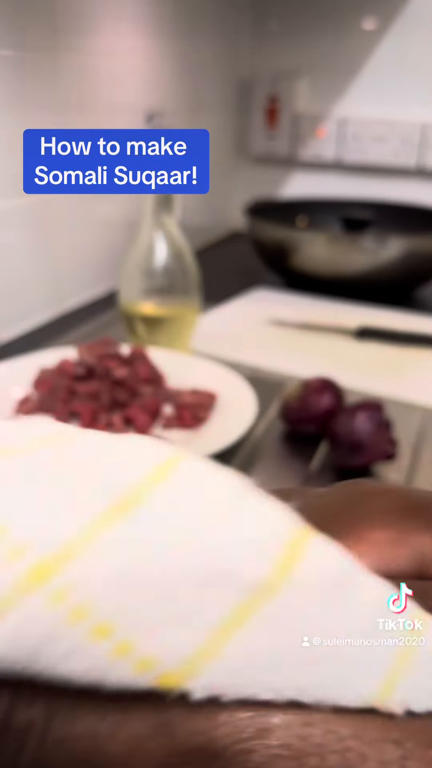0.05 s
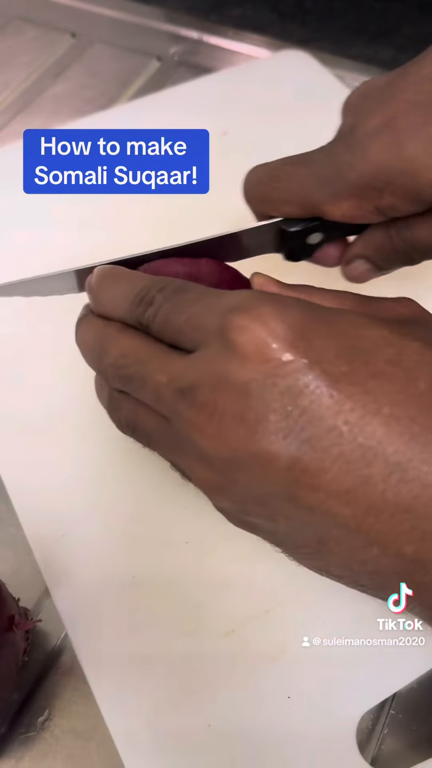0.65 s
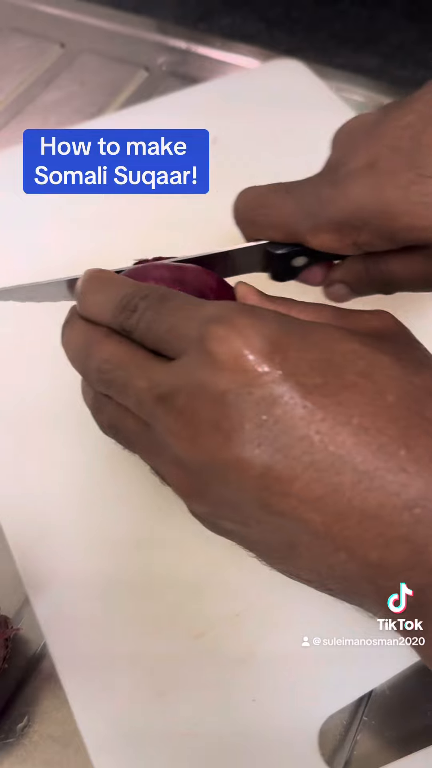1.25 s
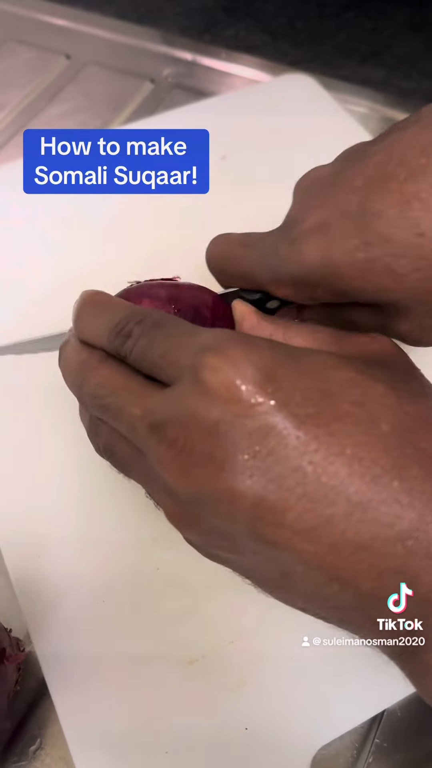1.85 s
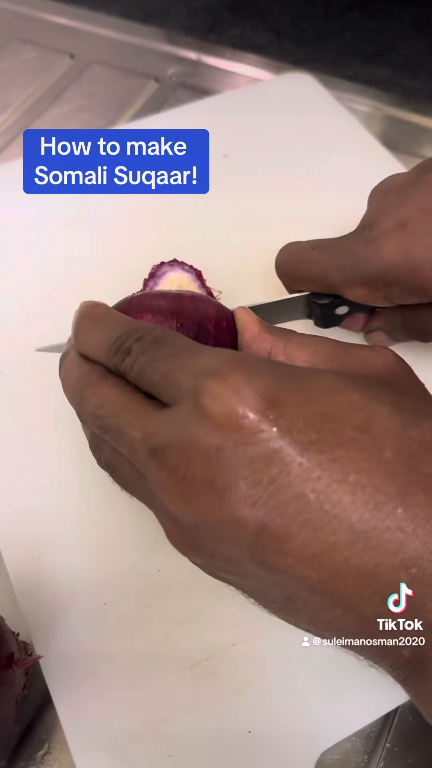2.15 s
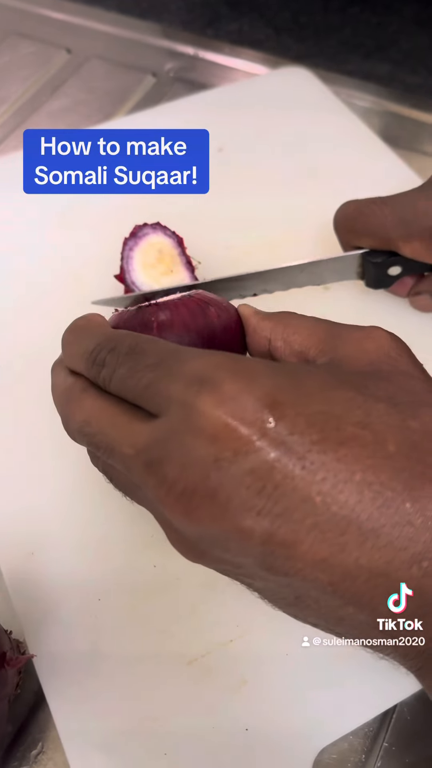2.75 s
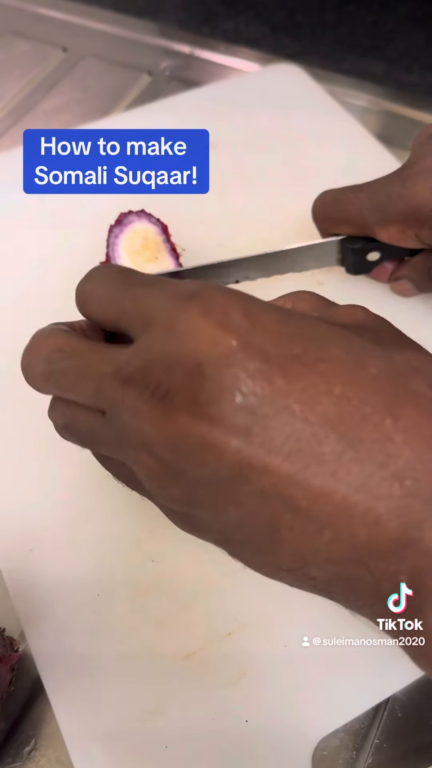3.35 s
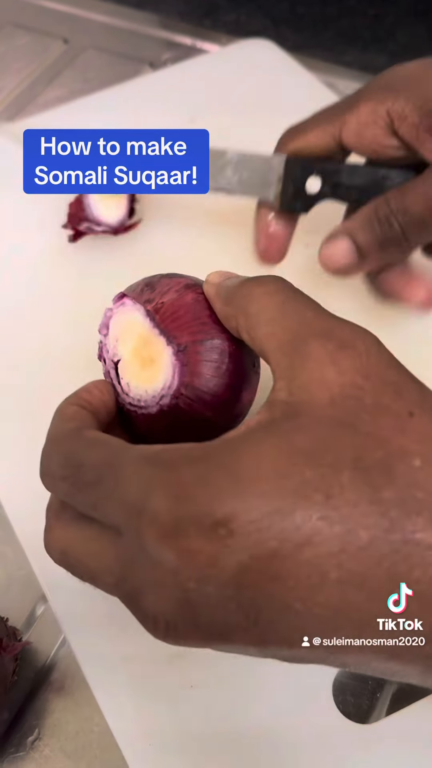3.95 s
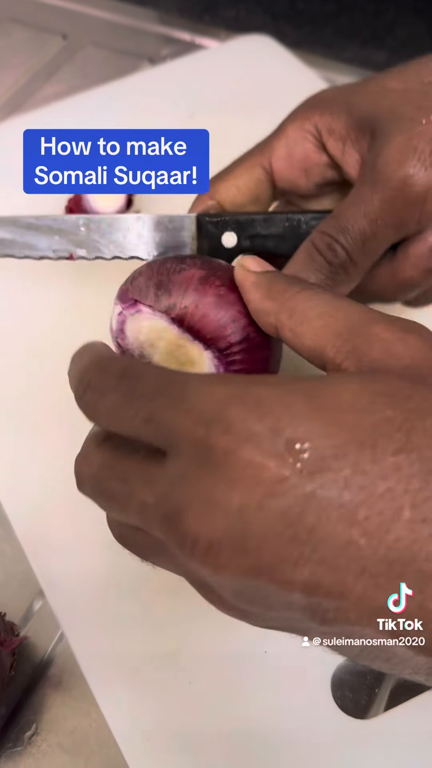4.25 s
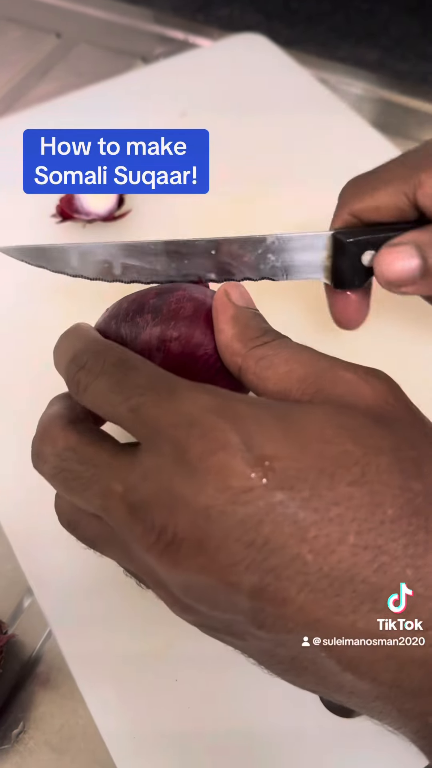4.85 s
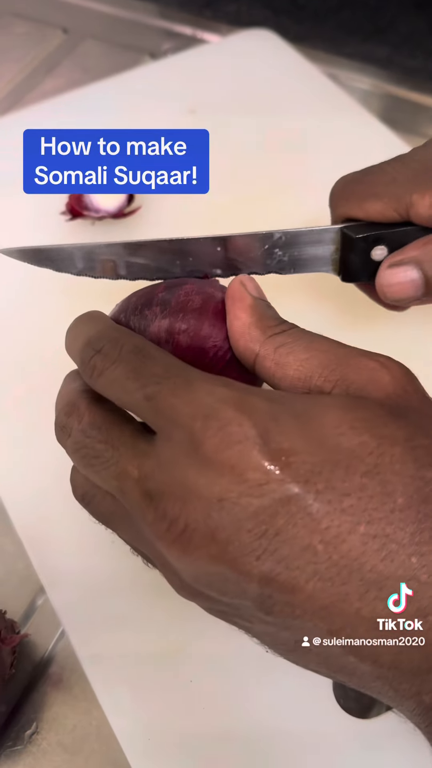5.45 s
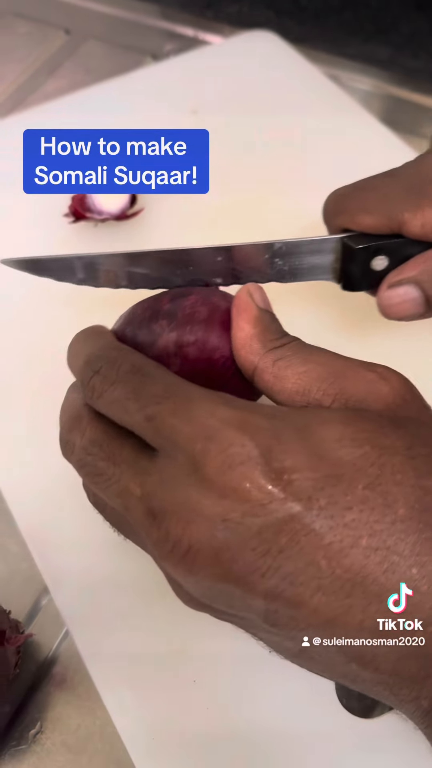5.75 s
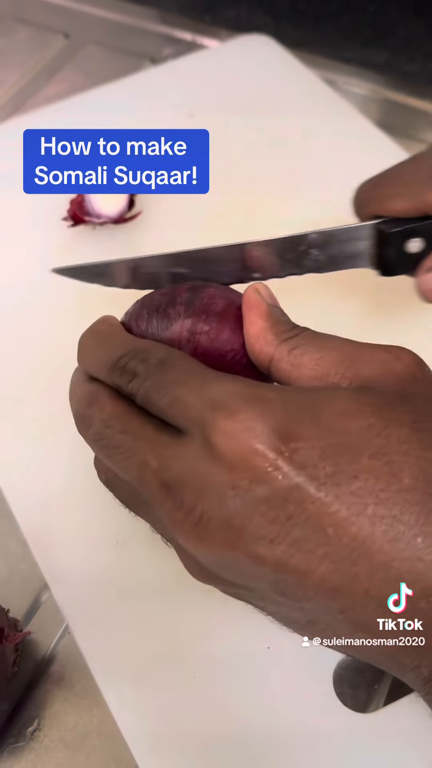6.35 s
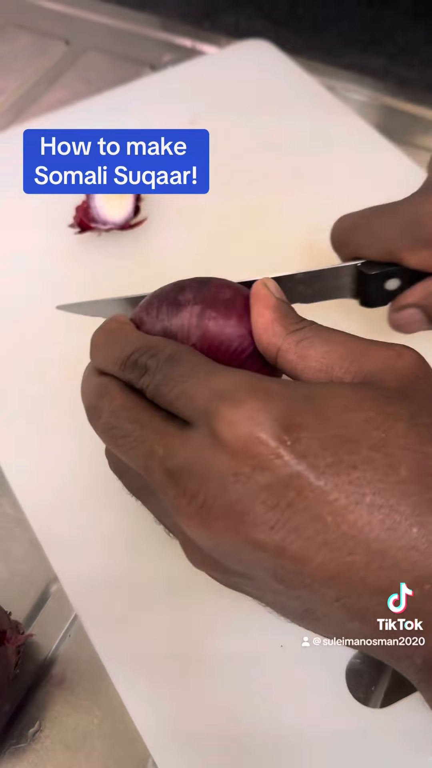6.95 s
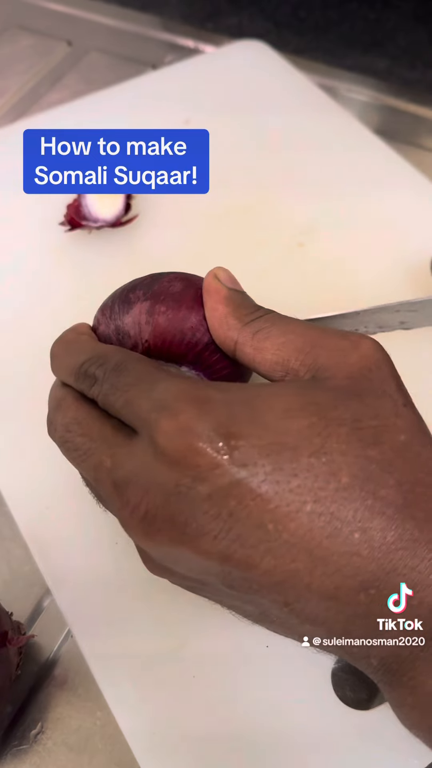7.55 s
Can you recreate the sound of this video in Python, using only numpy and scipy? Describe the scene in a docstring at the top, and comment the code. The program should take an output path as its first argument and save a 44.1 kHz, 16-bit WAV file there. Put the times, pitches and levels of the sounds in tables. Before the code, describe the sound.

After a brief towel rustle, a serrated knife saws into an onion in short strokes, crackling the dry skin and shaking a plastic chopping board. The blade knocks down, draws through with a wet fizz and lands with a sharp clack. The onion is turned and set down with a soft thump, then after a lull the sawing resumes. It is heard close in a small, hard kitchen with a low hum.

```python
"""A serrated knife saws both ends off an onion on a plastic chopping board.
Each stroke crackles through the dry skin and shakes the board; the blade knocks down as it breaks
through. A towel rustles briefly first, and between the two cuts the onion is turned and set down.
It is all heard from close by, in a small, hard kitchen with a low hum."""
import sys
import numpy as np
from scipy import signal
from scipy.fft import rfft, irfft, next_fast_len
from scipy.io import wavfile
from scipy.ndimage import uniform_filter1d

SR = 44100
rng = np.random.default_rng(int(sys.argv[2]) if len(sys.argv) > 2 else 0)


def transcribe(signal):
    """Save signal, clipped to [-1, 1], as a 16-bit WAV file at the path in sys.argv[1]."""
    frames = np.atleast_2d(signal).T
    limited = np.clip(frames, -1, 1)
    pcm = np.round(limited * 32767).astype(np.int16)
    wavfile.write(sys.argv[1], SR, pcm)


N = 334983
T = np.arange(N) / SR
SCRAPE_START_S = 2.76  # the blade starts to scrape out of the cut
TEAR_START_S, TEAR_LENGTH_S = 3.318, 0.209  # the last strip of skin tears
TREBLE_LIMIT_HZ = 16200


def sawing():
    """The knife's teeth burst the onion's skin and cells, and the same drag shakes the board."""
    crackle, grind, push = saw_motion()
    fizz, load = slow_draw()
    crackle += amp(-8.5) * fizz * (T < SCRAPE_START_S)  # skin still lies under the teeth
    onion = bursting_onion(crackle, fizz)
    return onion + shaking_board(amp(-5.5) * grind + amp(-2.5) * load, push + amp(11) * load)


# saw strokes: (start [s], length [s], skin crackle [dB], load on the teeth [dB], push on the board [dB])
SAW_STROKES = [(0.183, 0.09, -56.5, -58.5, -46), (0.323, 0.08, -57.5, -65, -48),
               (0.455, 0.072, -54, -52, -44), (0.6, 0.091, -57.5, -59, -45.5),
               (0.751, 0.078, -57.5, -53.5, -43.5), (0.871, 0.13, -61.5, -57, -46.5),
               (1.042, 0.12, -57, -55, -42.5), (1.167, 0.14, -66, -58.5, -49.5),
               (1.348, 0.1, -54, -46.5, -39), (1.476, 0.12, -60, -57.5, -49.5),
               (1.662, 0.063, -59, -49.5, -40.5), (1.719, 0.082, -35.5, -54, -35),
               (1.842, 0.11, -39.5, -63, -39.5), (1.958, 0.24, -78, -57, -42.5),
               (2.18, 0.094, -46.5, -45.5, -49), (6.126, 0.086, -60.5, -63.5, -49.5),
               (6.256, 0.074, -53.5, -58.5, -43.5), (6.39, 0.092, -43.5, -52.5, -43),
               (6.533, 0.076, -46, -52.5, -41), (6.666, 0.087, -41.5, -47, -38.5),
               (6.807, 0.084, -49, -52, -42), (6.931, 0.11, -41.5, -54.5, -35.5),
               (7.078, 0.098, -33.5, -46.5, -36), (7.2, 0.12, -52, -58, -41),
               (7.364, 0.089, -46, -52.5, -46.5), (7.501, 0.13, -60.5, -56, -47)]
# the blade rests on the skin, feeling for its place: (start [s], length [s], level [dB])
BLADE_GRAZES = [(5.095, 0.072, -85), (5.296, 0.196, -90), (5.561, 0.39, -79), (5.991, 0.1, -78)]
# fingers rustle over the loose skin: (start [s], length [s], level [dB])
FINGER_RUSTLES = [(3.558, .13, -66), (3.693, 0.16, -75.5), (3.885, .08, -73), (4.013, 0.061, -73.5),
                  (4.116, 0.058, -77), (4.26, 0.063, -76.5), (4.39, .045, -77.5)]
def saw_motion(lead_s=0.03, grind_lag_s=0.0097, push_lag_s=0.012, push_release_s=0.099):
    """How strongly the skin crackles, the teeth grind and the board is pushed at each moment."""
    crackle, grind, push = np.zeros((3, N))
    for start, length, crackle_db, load_db, push_db in SAW_STROKES:
        speed = stroke(length)
        add(crackle, start - lead_s, amp(crackle_db - 15.5) * stroke(2 * lead_s))  # a light drag first
        add(crackle, start, amp(crackle_db) * speed)
        add(grind, start + grind_lag_s, amp(load_db) * speed)
        # the board takes the load later and lets go of it slowly
        pressure = stroke(length + push_release_s / 2, push_release_s)
        add(push, start + push_lag_s, amp(push_db) * pressure)
    for start, length, db in BLADE_GRAZES + FINGER_RUSTLES:
        add(crackle, start, amp(db) * stroke(length))
    add(push, TEAR_START_S, amp(-58.5) * stroke(TEAR_LENGTH_S))
    return crackle, grind, push


def stroke(length, release_s=0.024, attack_s=0.035):
    """One pass of the blade speeds up, runs and stops."""
    t = T[:round(length * SR)]
    rise = np.sin(np.pi / 2 * np.clip(t / attack_s, 0, 1))
    fall = np.sin(np.pi / 2 * np.clip((length - t) / release_s, 0, 1))
    return rise * fall


# the slow pull through the wet flesh: (time [s], juicy fizz [dB], load on the teeth [dB])
DRAW_LEVELS = [(2.29, -55, -76), (2.312, -67, -75), (2.334, -51.5, -64.5), (2.385, -48, -54.5),
               (2.41, -88, -61.5), (2.425, -53.5, -61.5), (2.535, -44, -71), (2.58, -46, -60),
               (2.67, -55, -64), (2.688, -45, -58.5), (2.72, -58.5, -66), (2.85, -61, -75),
               (2.865, -76, -76), (2.885, -59, -70.5), (2.92, -55.5, -74), (2.97, -72, -76.5),
               (3.04, -53.5, -79.5), (3.09, -71.5, -79), (3.145, -57.5, -76.5), (3.24, -103, -99)]
def slow_draw(fizz_db_per_s=190.5, load_db_per_s=89.5):
    """Strength of fizz and load in one slow pull, ending in a tear that grows until the skin gives."""
    fizz, load = gains(DRAW_LEVELS)
    pull = stroke(TEAR_LENGTH_S, release_s=0.0035)
    time_left = TEAR_LENGTH_S - T[:len(pull)]
    add(fizz, TEAR_START_S, pull * amp(-42 - fizz_db_per_s * time_left))
    add(load, TEAR_START_S, pull * amp(-58.5 - load_db_per_s * time_left))
    return fizz, load


# tone colour of the dry skin: (frequency [Hz], relative level [dB])
SKIN_COLOUR = [(300, -23), (900, 3.5), (2000, -2.5), (3000, 3), (4300, 2), (6000, 4), (7500, 2.5),
               (9600, 7.5), (12000, 5.5), (15000, 8), (16200, 6)]
# tone colour of the juicy flesh: (frequency [Hz], relative level [dB])
JUICE_COLOUR = [(2000, -30), (5500, -13), (7100, -15), (8500, -11), (10500, -6.5), (12500, -7.5),
                (14500, -0.5), (15600, 3), (16300, -19)]
def bursting_onion(crackle, fizz):
    """Dry skin crackles and wet cells fizz as thousands of them break under the teeth."""
    flakes = grains(per_s=7000, spread_db=3.5, clump_db=2.7, clump_hz=90)
    cells = grains(per_s=2000, spread_db=4, clump_db=2.4, clump_hz=60)
    skin = amp(-0.2) * coloured(shifting(flakes, shift_db=0.5, rate_hz=10), SKIN_COLOUR)
    juice = amp(-0.6) * coloured(shifting(cells, shift_db=3, rate_hz=34.85), JUICE_COLOUR)
    skin += amp(-9.5) * coloured(chips(), SKIN_COLOUR)
    juice += amp(-9.5) * coloured(chips(), JUICE_COLOUR)
    return (skin + rasp()) * crackle + juice * fizz


def shifting(x, shift_db, rate_hz, edges_hz=(1200, 2200, 3600, 6000, 11000)):
    """Coarse, middling and fine breaks take turns, so the tone colour keeps changing."""
    size = next_fast_len(len(x))
    spectrum = rfft(x, size)
    band = np.searchsorted(edges_hz, np.fft.rfftfreq(size, 1 / SR))
    return sum(irfft(spectrum * (band == k), size)[:N] * amp(shift_db * wobble(rate_hz))
               for k in range(len(edges_hz) + 1))


def chips(per_s=45, decay_s=0.0039):
    """Small flakes break off at random, each with a short crack."""
    t = T[:SR // 50]
    crack = rng.standard_normal(len(t)) * np.exp(-t / decay_s)
    breaks = grains(per_s=per_s, spread_db=2.5, clump_db=1, clump_hz=20)
    return evened(signal.oaconvolve(breaks, crack)[:N])


# the notes at which the stiff skin rings: (pitch [Hz], relative level [dB])
RASP_NOTES = [(2400, -17), (4500, -12.5)]
def rasp(width_hz=260, waver=0.077, waver_hz=9):
    """Teeth catch and ring the stiff skin, whose pitch drifts as the blade travels."""
    out = np.zeros(N)
    for hz, db in RASP_NOTES:
        catches = grains(per_s=900, spread_db=2.5, clump_db=2.5, clump_hz=60)
        pitch = hz * (1 + waver * wobble(waver_hz))
        carrier = np.exp(2j * np.pi * np.cumsum(pitch) / SR)
        # keep only a narrow band around the moving pitch
        ringing = carrier * filtered(catches / carrier + 1e-12, width_hz, "low")
        out += amp(db) * evened(ringing.real)
    return out


# tone colour of the push on the board: (frequency [Hz], relative level [dB])
PUSH_COLOUR = [(20, -24.5), (42, 14), (70, 0.5), (115, 3.5), (210, 0.5), (330, -7.5), (500, -17.5),
               (1000, -28.5)]
def shaking_board(grind, push):
    """Slipping teeth rattle the board, while the drag of the blade makes it rumble."""
    slips = grains(per_s=1300, spread_db=3.3, clump_db=2.2, clump_hz=60)
    ring = board_ring()
    rattle = evened(signal.oaconvolve(slips, ring)[:N])
    grit = evened(filtered(slips, [300, 2200], "band"))
    teeth = evened(filtered(rattle + 2.2 * grit, 240, "high", order=3))
    rumble = coloured(signal.oaconvolve(rng.standard_normal(N), ring)[:N], PUSH_COLOUR)
    return teeth * grind + rumble * push


# the board's own notes, with no hand on it: (pitch [Hz], relative level [dB], time to fade 60 dB [s])
BOARD_NOTES = [(41.5, -9.5, 0.8), (63, -1, 0.075), (115, 1.5, 0.26), (210.2, -0.5, .22), (255, -3, 0.12),
               (288.5, -7, 0.36), (324, -0.5, 0.13), (404, 0, 0.12), (466, -7.5, 0.66), (537.5, -4, 0.45),
               (708, 1.5, 0.07), (824, -8.5, 0.28), (954, 5, 0.036), (1085, 0, 0.11), (1253, -6.5, 0.25),
               (1720, -5.5, 0.039), (2230, -9, 0.08)]
def board_ring(hand_damping_s=0.069):
    """The board rings after one sharp tap, cut short by the hand that rests on it."""
    t = T[:SR // 2]
    notes = sum((-1) ** k * amp(db - 60 * t / fade_s) * np.sin(2 * np.pi * hz * t)
                for k, (hz, db, fade_s) in enumerate(BOARD_NOTES))
    return notes * np.exp(-t / hand_damping_s)


# skin snaps under blade and fingers: (time [s], relative level [dB], pitch [Hz], decay time [s])
SKIN_SNAPS = [(.3546, -41, 13000, 0.0024), (.4564, -57, 14000, .002), (0.4663, -52, 4930, .003),
              (.467, -39, 12000, .002), (.7765, -35.5, 12000, .002), (.7865, -28.5, 12200, 0.0055),
              (.788, -37.5, 4250, 0.0035), (.801, -43, 13100, 0.0027), (.9716, -34.5, 11900, .003),
              (1.0725, -41, 11100, 0.0025), (1.2113, -37.5, 8470, 0.0036), (1.3743, -38, 5850, 0.0024),
              (1.385, -30, 12120, 0.0012), (1.4296, -42, 4220, .002), (1.516, -34, 12470, 0.0018),
              (1.729, -20.5, 11280, 0.0024), (1.742, -23.5, 4144, .003), (1.956, -24, 4710, 0.00097),
              (1.9594, -25, 9040, 0.0018), (2.3417, -52, 13680, 0.0026), (2.4165, -34, 14800, 0.0018),
              (2.436, -41, 14460, 0.0017), (2.47, -43, 14400, 0.0017), (2.5104, -36, 10800, 0.0032),
              (2.686, -33.5, 7350, 0.0082), (2.7583, -35.5, 15270, 0.0013), (2.8406, -44.5, 14900, 0.0026),
              (2.8677, -57, 14600, 0.0017), (2.984, -55, 12100, .002), (3.1094, -43, 14000, .003),
              (3.377, -49, 7740, .003), (3.519, -25, 13300, .003), (3.8018, -56, 10300, 0.0048),
              (3.9075, -45, 9200, .004), (3.908, -54, 2780, .004), (4.297, -57, 2000, .003),
              (4.1342, -63, 8600, 0.0035), (4.4078, -62.5, 10300, .008), (4.7835, -66.5, 3490, .005),
              (5.322, -67, 11200, 0.0023), (5.4635, -63, 14140, .002), (6.4065, -44, 11000, 0.0018),
              (6.5453, -37.5, 4770, 0.0044), (7.0852, -26, 7850, 0.0044), (7.232, -26.5, 11100, 0.0034),
              (7.394, -29.5, 10100, 0.0049)]
def snaps(band_ratio=1.23, level_db=-18):
    """A flake of dry skin cracks: a quick run of tiny breaks that dies away."""
    out, t = np.zeros(N), T[:SR // 30]
    for start, db, hz, decay in SKIN_SNAPS:
        breaks = rng.standard_normal(len(t)) * amp(2.5 * lumps(len(t), width=30))
        band = [hz / band_ratio, min(hz * band_ratio, TREBLE_LIMIT_HZ)]
        crack = filtered(breaks * np.exp(-t / decay), band, "band", order=1)
        add(out, start, amp(db + level_db) * evened(crack))
    return out


# blade, onion and knuckles hit the board: (time [s], level [dB], pitch [Hz]); a high pitch is a hard hit
BOARD_KNOCKS = [(.887, -40, 1700), (.929, -40, 1540), (.960, -36, 1560), (1.114, -43, 850),
                (1.141, -38.5, 1400), (1.428, -28.5, 1120), (1.453, -50, 810), (1.531, -39.5, 1480),
                (1.671, -42.5, 1600), (1.74, -31, 2080), (1.8, -36.5, 950), (2.03, -33.5, 1310),
                (2.155, -43, 930), (2.337, -42, 1430), (3.528, -24.5, 1530), (3.535, -27, 1600),
                (3.54, -25.5, 629), (3.555, -28.5, 474), (3.566, -31, 399), (4.136, -65.5, 1670),
                (4.312, -47.5, 702), (4.325, -49, 1000), (6.178, -37, 221), (6.733, -29.5, 269),
                (7.12, -30.5, 553), (7.138, -29.5, 825), (7.157, -29, 557), (7.266, -33, 402),
                (7.321, -30.5, 1060), (7.583, -41.5, 815)]
# the blade breaks through and lands on the board: (time [s], level [dB], pitch [Hz])
BLADE_LANDINGS = [(1.907, -17, 830), (3.524, -26.5, 800)]
def knocks(rock_s=0.0045, slowing=1.4, rock_db=-5, dulling=0.8):
    """Single hits, and a blade that lands and rocks to rest, each touch later, weaker and duller."""
    out = np.zeros(N)
    rocking = [(start + rock_s * k ** slowing, db + rock_db * k, hz * dulling ** k)
               for start, db, hz in BLADE_LANDINGS for k in range(4)]
    for start, db, hz in BOARD_KNOCKS + rocking:
        add(out, start, amp(db) * knock(hz))
    return out


def knock(hz, hard_hz=1320, band_ratio=1.25, rise_cycles=0.48, soft_db_per_octave=4):
    """A hard hit crunches and rings the board; a soft one bumps and wakes only its low notes."""
    ring = board_ring()
    t = T[:len(ring)]
    hardness = min(hz / hard_hz, 1)
    band = [hz / band_ratio, hz * band_ratio]
    crunch = evened(filtered(rng.standard_normal(len(t)), band, "band", order=1))
    tone = max(1 - 1.3 * hardness, 0) * np.sin(2 * np.pi * hz * t) + hardness * crunch
    fade_s = 0.024 * (1500 / hz) ** 0.27  # low bumps last longer
    swell = 1 - np.exp(-t * hz * hardness / rise_cycles)
    contact = peaked(filtered(tone * amp(-60 * t / fade_s) * swell, 2.4 * hz, "low"))
    board = peaked(filtered(ring, 0.53 * hz, "low"))
    return contact + amp(-4 + soft_db_per_octave * np.log2(hardness)) * board


def clack(start_s=3.527, length_s=0.0038, db=-16.5, hz=1986):
    """The steel blade chatters on the plastic in one short, bright clack."""
    out, t = np.zeros(N), T[:round(length_s * SR)]
    add(out, start_s, amp(db) * np.hanning(len(t)) * np.sin(2 * np.pi * hz * t))
    return out


# the teeth catch in the flesh: (start [s], length [s], level [dB], typical slip rate [Hz])
BLADE_JUDDERS = [(0.242, 0.043, -51.5, 207), (0.494, .04, -51, 264), (0.791, 0.051, -48.5, 203),
                 (1.075, 0.062, -56.5, 225), (1.426, 0.045, -40, 315), (1.715, 0.074, -47, 235),
                 (1.927, 0.066, -43, 310), (2.052, 0.041, -45, 200), (2.191, 0.041, -44.5, 347),
                 (2.497, 0.17, -53, 220), (6.283, 0.034, -49.5, 250), (6.405, 0.053, -41.5, 216),
                 (6.548, 0.035, -51, 260), (6.69, 0.043, -43, 380), (6.96, 0.059, -42.5, 203),
                 (7.098, 0.038, -38, 277), (7.269, 0.069, -46, 215), (7.403, 0.063, -47, 356)]
def judders(jitter=0.16, slowing=0.2, slip_s=0.0027, top_hz=620):
    """The blade sticks and slips in an uneven run of soft jolts that slows towards its end."""
    out, t = np.zeros(N), T[:SR // 4]
    for start, length, db, hz in BLADE_JUDDERS:
        progress = np.minimum(t / length, 1)
        rate = hz * (1 + slowing * (0.5 - progress)) * np.exp(jitter * lumps(len(t), width=150))
        since_slip = np.cumsum(rate) / SR % 1 / hz
        jolts = np.exp(-since_slip / slip_s) * amp(2.8 * lumps(len(t), width=200))
        swell = np.sqrt(abs(np.sin(np.pi * progress)))
        add(out, start, amp(db) * evened(filtered(jolts, [0.61 * hz, top_hz], "band")) * swell)
    return out


def scrape(length_s=0.27, db=-69, hz=7350, width_hz=420, waver=0.043):
    """The flat of the blade rubs on wet onion: a thin hiss whose pitch and strength waver."""
    out, speed = np.zeros(N), stroke(length_s)
    hiss = filtered(rng.standard_normal(len(speed)), width_hz, "low")
    pitch = hz * (1 + waver * wobble(13, len(speed)))
    rub = hiss * np.cos(2 * np.pi * np.cumsum(pitch) / SR) * amp(3.6 * wobble(30, len(speed)))
    add(out, SCRAPE_START_S, amp(db) * speed * evened(rub))
    return out


# the onion's weight comes down on the board: (start [s], length of the press [s], level [dB], pitch [Hz])
ONION_THUMPS = [(1.994, 0.035, -33, 112), (3.552, 0.042, -29, 55.1), (3.598, 0.028, -31.5, 124.2),
                (4.306, 0.025, -25.5, 114.5), (4.316, 0.02, -35.5, 201), (4.385, 0.04, -47.5, 173),
                (4.343, 0.076, -42.5, 47.6), (4.352, 0.033, -43, 126), (4.794, 0.038, -41, 123)]
def thumps(hum_db=-9, hum_fade_s=0.31, murmur_db=-12):
    """A soft press swells into a round low tone, and the board hums on."""
    out, t = np.zeros(N), T[:SR // 2]
    for start, length, db, hz in ONION_THUMPS:
        press = np.sin(np.pi * np.minimum(t / length, 1)) ** 2
        hum = np.cumsum(press) / press.sum() * amp(hum_db - 60 * t / hum_fade_s)
        tone = np.sin(2 * np.pi * hz * t) * (press + hum)
        murmur = evened(filtered(rng.standard_normal(len(t)), [150, 380], "band", order=3))
        add(out, start, amp(db) * (tone + amp(murmur_db) * murmur * hum))
    return out


# the onion is turned on the board and pressed down: (time [s], relative level [dB])
SLIDE_LEVELS = [(4.02, -90.5), (4.035, -71), (4.09, -94.5), (4.14, -76), (4.19, -92), (4.29, -83),
                (4.306, -72), (4.318, -55.5), (4.345, -78.5), (4.43, -85)]
def slide():
    """Onion skin rubs and crushes softly against the plastic."""
    crumbs = grains(per_s=3000, spread_db=2, clump_db=2, clump_hz=60)
    rub = evened(filtered(crumbs, [1000, 2300], "band", order=3))
    return rub * gains(SLIDE_LEVELS)[0] * amp(-2)


# the towel moves over the hands: (time [s], relative level [dB])
TOWEL_LEVELS = [(0.0, -65.5), (0.012, -64.5), (0.088, -77), (0.11, -59.5), (0.17, -82)]
# tone colour of the cloth: (frequency [Hz], relative level [dB])
CLOTH_COLOUR = [(150, 21.5), (600, 1.5), (1500, 1), (4000, -6), (8000, -4.5), (15000, 3.5)]
def towel():
    """Towel fibres brush over the hands in a fine rustle."""
    fibres = grains(per_s=5000, spread_db=3, clump_db=3, clump_hz=50)
    return coloured(fibres, CLOTH_COLOUR) * gains(TOWEL_LEVELS)[0] * amp(6)


# how long the kitchen echoes: (frequency [Hz], time to fade 60 dB [s])
ECHO_FADES = [(60, 0.85), (250, 0.16), (700, 0.36), (2000, 0.33), (5000, 0.38), (10000, 0.3), (16000, 0.27)]
# how loud the echo is next to the direct sound: (frequency [Hz], level [dB])
ECHO_LEVELS = [(50, -5), (130, -5), (300, 0), (600, 3), (1200, 2), (2000, -.5), (3000, .5), (6000, -2),
               (10000, -5.5), (16000, -7)]
def kitchen_echo(x, echoes_per_s=3500, gap_s=0.002):
    """Sound bounces off tiles and worktop in a dense, short wash; the deep bass lasts longest."""
    t = T[:SR * 3 // 4]
    bounces = rng.standard_normal((2, len(t))) * (rng.random((2, len(t))) < echoes_per_s / SR)
    bounces *= np.clip((t - gap_s) / 0.00072, 0, 1)
    hz, times, bands = signal.stft(bounces, SR, nperseg=256)
    fade_s = read(ECHO_FADES, hz)[:, None]
    bands = bands * amp(read(ECHO_LEVELS, hz)[:, None] - 60 * times / fade_s)
    bands *= np.sqrt(np.log(10 ** 6) / (fade_s * SR)) / bounces.std()  # a longer fade adds no energy
    response = stereo_spread(*signal.istft(bands, SR, nperseg=256)[1])
    return signal.oaconvolve(x[None], response, axes=1)[:, :N]


# tone colour of the still air: (frequency [Hz], relative level [dB])
AIR_COLOUR = [(20, -22.5), (50, 7), (85, -2), (160, -3), (220, 0), (320, -13.5), (600, -20), (1200, -30),
              (3000, -36), (7000, -43.5), (11000, -36.5), (15500, -40)]
def room_tone(air_db=-68, hum_hz=116, hum_width_hz=7, hum_db=-61, throb_hz=6.3, throb_db=3.5):
    """Still air and a low hum that throbs unevenly."""
    air = stereo_spread(*[coloured(noise, AIR_COLOUR) for noise in rng.standard_normal((2, N))])
    hum_band = [hum_hz - hum_width_hz, hum_hz + hum_width_hz]
    hum = evened(filtered(rng.standard_normal(N), hum_band, "band"))
    throb = evened(filtered(rng.standard_normal(N), [throb_hz, 2 * throb_hz], "band", order=1))
    return amp(air_db) * air + amp(hum_db) * evened(hum * amp(throb_db * np.clip(throb, -2, 2)))


# how alike the room sounds on the left and right: (frequency [Hz], likeness [-1 to 1])
SIDE_LIKENESS = [(60, .88), (150, .9), (300, .3), (550, -.5), (1200, -.1), (2200, -.45), (5000, -.5),
                 (7500, .2), (9300, .75), (16000, .7)]
def stereo_spread(left, other):
    """Blends two unrelated sounds into a left and right that seem to come from all around."""
    size = next_fast_len(len(left))
    likeness = np.clip(read(SIDE_LIKENESS, np.fft.rfftfreq(size, 1 / SR)), -1, 1)
    right = irfft(likeness * rfft(left, size) + np.sqrt(1 - likeness ** 2) * rfft(other, size), size)
    return np.array([left, right[:len(left)]])


def grains(per_s, spread_db, clump_db, clump_hz):
    """Tiny clicks of very unequal size, which come in loud and quiet clumps."""
    sizes = amp(spread_db * np.minimum(rng.exponential(1, N), 4)) * rng.choice([-1, 1], N)
    clumps = np.clip(wobble(clump_hz), -2, 2)
    return evened(sizes * (rng.random(N) < per_s / SR) * amp(clump_db * clumps))


def wobble(hz, samples=N):
    """A smooth random curve that moves up to about hz times a second."""
    return evened(filtered(rng.standard_normal(samples), hz, "low"))


def lumps(samples, width):
    """A bumpy random curve: noise averaged over width samples."""
    return evened(uniform_filter1d(rng.standard_normal(samples), size=width))


def amp(db):
    """Turns decibels into a gain to multiply by."""
    return 10 ** (np.asarray(db) / 20)


def evened(x):
    """Scales to an average (rms) level of 1."""
    return x / np.sqrt(np.mean(x ** 2) + 1e-20)


def peaked(x):
    """Scales to a peak of 1."""
    return x / (abs(x).max() + 1e-20)


def read(points, hz):
    """Looks up a value between a table's rows, on a scale of octaves."""
    frequencies, values = np.transpose(points)
    return np.interp(np.log(hz + 1), np.log(frequencies + 1), values)


def coloured(x, colour):
    """Gives x a tone colour, at an average level of 1."""
    size = next_fast_len(len(x))
    gain = amp(read(colour, np.fft.rfftfreq(size, 1 / SR)))
    return evened(irfft(rfft(x, size) * gain, size)[:len(x)])


def filtered(x, hz, kind, order=2):
    """Keeps the lows, the highs or one band."""
    return signal.sosfilt(signal.butter(order, np.clip(hz, 10, .49 * SR), kind, fs=SR, output="sos"), x)


def add(mix, start_s, sound):
    """Mixes a sound in at its start time."""
    part = mix[max(round(start_s * SR), 0):][:len(sound)]
    part += sound[:len(part)]


def gains(rows):
    """Turns each level column into a smooth gain curve, silent outside the listed times."""
    times, *columns = np.transpose(rows)
    curves_db = [np.interp(T, times, column, left=-150, right=-150) for column in columns]
    return uniform_filter1d(amp(curves_db), size=300)


def scene(clack_echo_db=-7):
    """Knife, onion, board and towel sound together in the echoing kitchen."""
    direct = sawing() + snaps() + knocks() + judders() + scrape() + thumps() + slide() + towel()
    into_room = direct + amp(clack_echo_db) * clack()  # the clack comes mostly straight from the blade
    # as hands and knife move, three sets of echo paths fade in and out in turn
    path_fades = [np.sqrt(2 / 3) * np.cos(np.pi * (T + k / 3)) for k in range(3)]
    echoes = sum(kitchen_echo(into_room * fade) for fade in path_fades)
    return direct + clack() + echoes + room_tone()


# how much louder the left microphone is than the right: (frequency [Hz], level [dB])
MIC_BALANCE = [(60, .9), (1000, .6), (2000, -.3), (2800, .5), (4200, 2.8), (7000, 2.5), (8200, .3),
               (16000, 0)]
# how far the right microphone's wave is shifted against the left: (frequency [Hz], phase [rad])
MIC_PHASE = [(0, 0), (8000, 0), (15800, 5 * np.pi), (22050, 9 * np.pi)]
def record(dry):
    """Two microphones hear slightly unlike levels and treble timing; the extreme lows and highs go."""
    size = next_fast_len(N + 1024)
    hz = np.fft.rfftfreq(size, 1 / SR)
    left = amp(read(MIC_BALANCE, hz) / 2)
    right = np.exp(1j * np.interp(hz, *np.transpose(MIC_PHASE))) / left
    heard = irfft(rfft(dry, size) * np.array([left, right]), size)[:, :N]
    heard = filtered(heard, 30, "high", order=3)
    treble_cut = signal.firwin(511, TREBLE_LIMIT_HZ, window=("kaiser", 9), fs=SR)
    return signal.oaconvolve(heard, treble_cut[None], "same")


dry = scene()
out = record(dry)
transcribe(out)
```